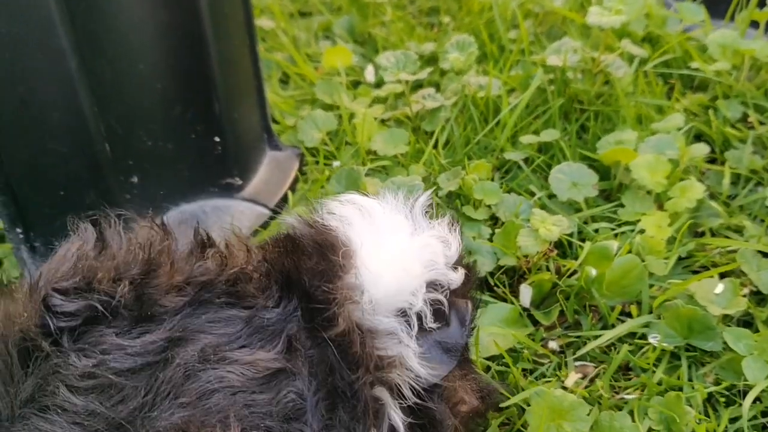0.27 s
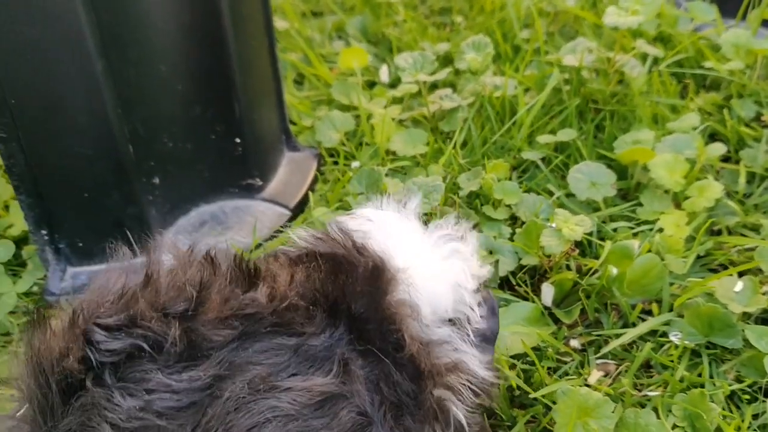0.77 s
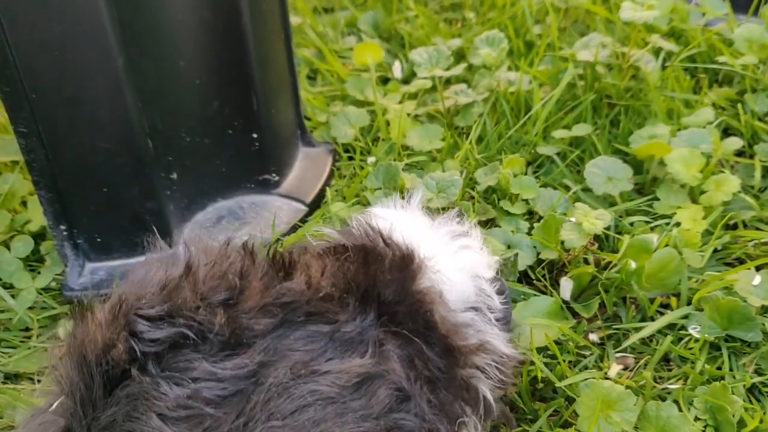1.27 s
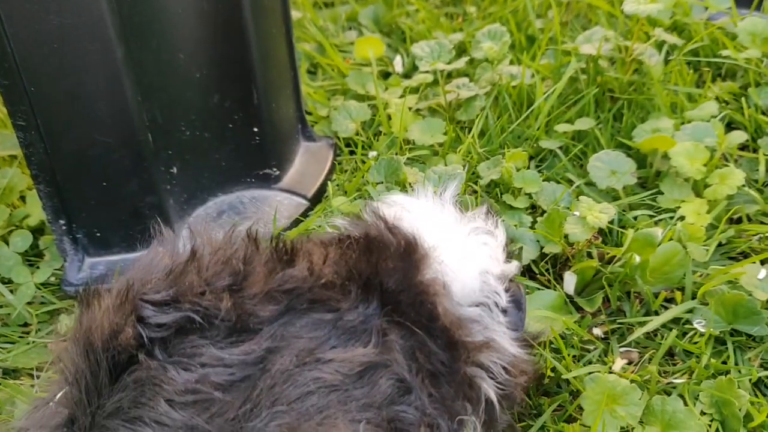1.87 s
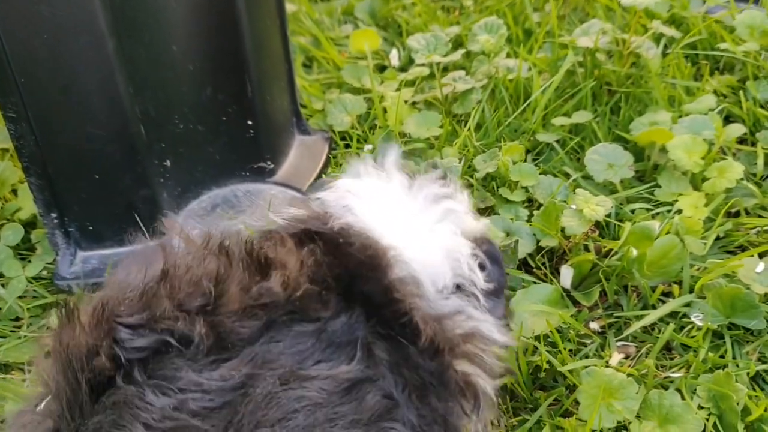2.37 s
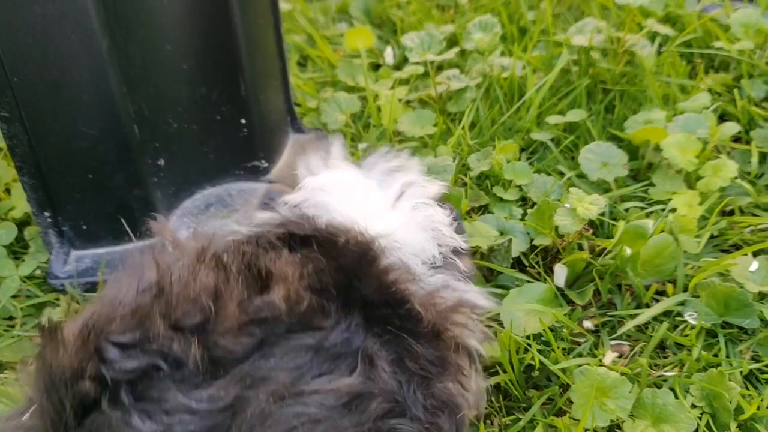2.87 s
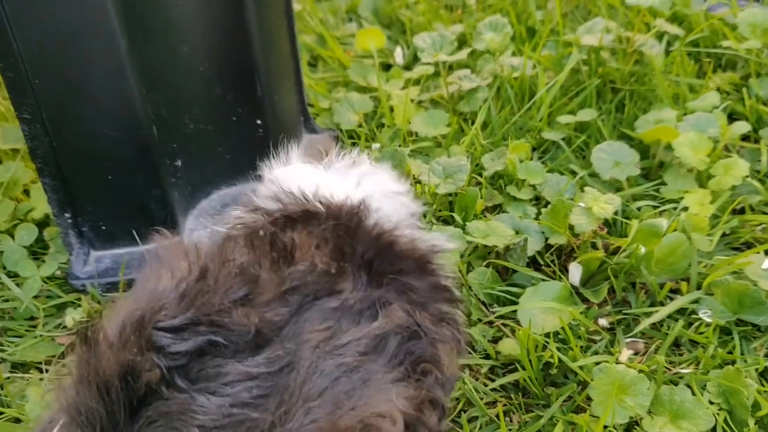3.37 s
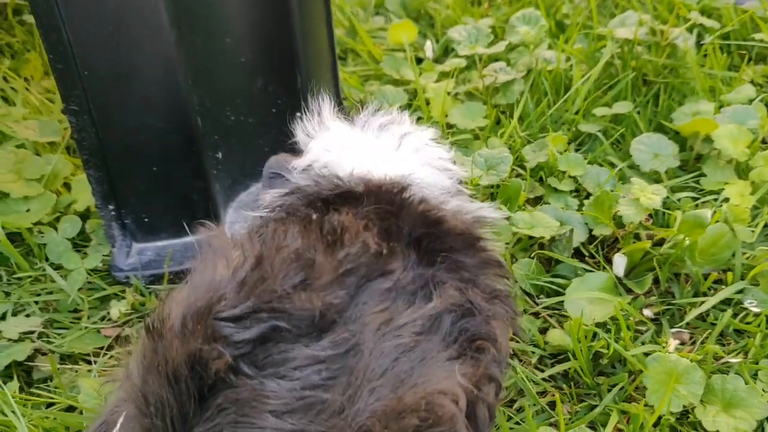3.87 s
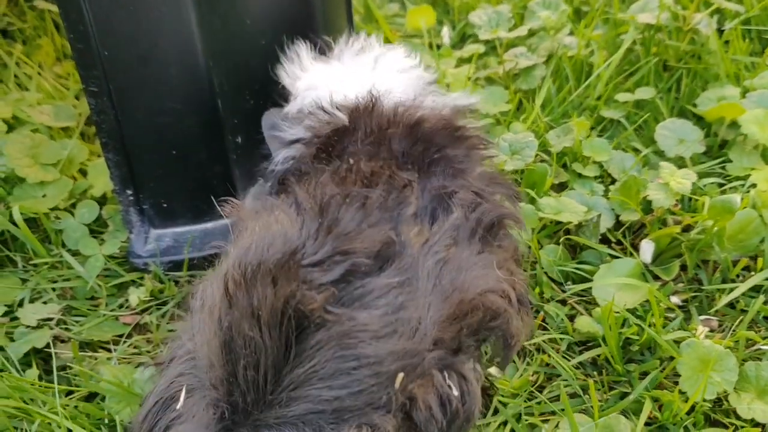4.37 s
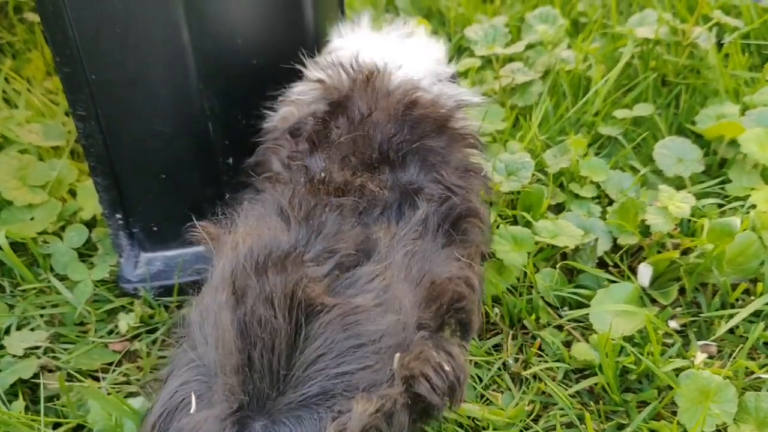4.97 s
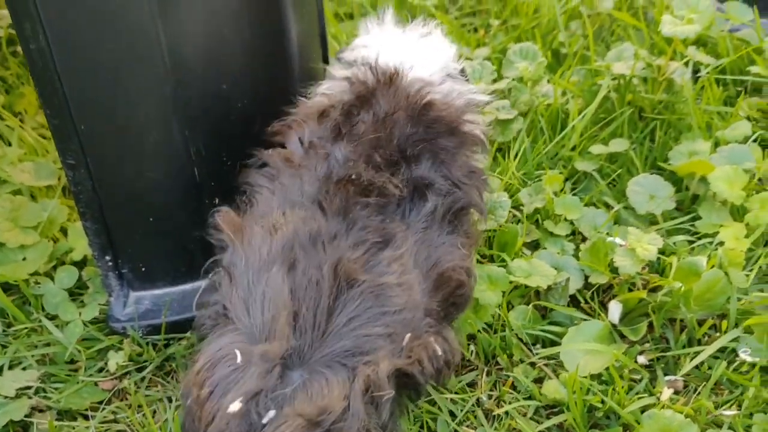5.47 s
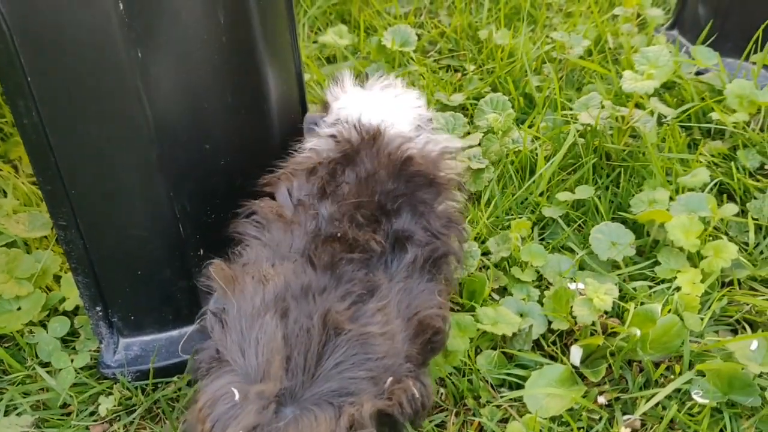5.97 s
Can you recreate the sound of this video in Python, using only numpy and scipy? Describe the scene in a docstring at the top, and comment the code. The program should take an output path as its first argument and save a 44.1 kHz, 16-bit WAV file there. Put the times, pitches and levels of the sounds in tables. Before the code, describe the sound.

Quick soft whistling squeaks and clucks from a small guinea pig outdoors, over low wind buffeting, a distant engine drone and faint bird chirps.

```python
"""A young guinea pig squeaks on a meadow, close to a hand-held stereo microphone.
Each squeak is a gliding, nearly pure tone with a rasp where the voice is pressed; the last shrink to clucks.
Where the whistle breaks or fails to start, short runs of pulses creak, each ringing the throat.
Wind buffets both ports as low noise and single eddies; a far engine drones in narrow bands of noise.
A small bird chirps far off in sliding tones; grass and leaves rustle as grainy hiss, and something snaps once."""
import sys
import numpy as np
from scipy import signal
from scipy.fft import rfft, irfft, next_fast_len
from scipy.io import wavfile

SR = 44100
rng = np.random.default_rng(int(sys.argv[2]) if len(sys.argv) > 2 else 0)


def digitize_waveform(pressure):
    """Quantize a signal to 16-bit integers and store it at the path in sys.argv[1].

    Rows of a 2-D input are taken as channels; values are limited to [-1, 1].
    """
    field = np.atleast_2d(pressure).T
    bounded = np.clip(field, -1, 1)
    quanta = np.round(bounded * 32767).astype(np.int16)
    wavfile.write(sys.argv[1], SR, quanta)


N = 274346
T = np.arange(N) / SR  # time in seconds

# Outdoor background common to both sides, before it is scaled to AIR_MID_DB.
# Each row: frequency in Hz, relative density in dB per Hz.
AIR_MID_COLOUR = [(41, -30), (70, 3), (96, -2), (115, -9), (151, -5), (177, -8), (250, -8.5), (325, -12),
                  (457, -17), (599, -20.5), (1030, -25), (3330, -38), (5360, -39), (15500, -39.5)]
# Outdoor background that differs between the sides, before it is scaled to AIR_SIDE_DB.
# Each row: frequency in Hz, relative density in dB per Hz.
AIR_SIDE_COLOUR = [(41, -33), (70, -7), (169, -18), (237, -10.5), (457, -16), (560, -18), (1410, -20.5),
                   (2910, -32.5), (4370, -31.5), (7350, -33.5), (15500, -33)]
AIR_MID_DB, AIR_SIDE_DB = -47, -56
# Bands of the far engine. Each row: centre in Hz, width of each of two band-passes in Hz, level in dB.
ENGINE_BANDS = [(82, 9.5, -55), (149.7, 16, -54.5), (200.7, 27.5, -60)]
# Far rustle of leaves, before flutter and side balance. Each row: time in seconds, level in dB.
LEAF_LEVELS = [(0, -68.5), (1.1, -70.5), (2.2, -65), (3, -61.5), (4.5, -64), (6.2, -65.5)]

# Turbulence at a microphone port. Each row: frequency in Hz, relative gain in dB.
WIND_COLOUR_POINTS = [(12, -22), (28, 5), (65, -3), (120, -7), (200, -22.5), (400, -29.5), (3000, -84)]
# Gusts on the microphone.
# Each row: middle in seconds, level in dB before sharing, half length in seconds, left share 0-1.
WIND_GUSTS = [(0.355, -37.5, 0.045, 0.8), (0.58, -35, 0.38, 0.89), (1.256, -34, 0.04, 0.85),
              (1.657, -33.5, 0.1, 0.81), (2.331, -40.5, 0.095, 1), (3.225, -34.5, 0.24, 0.59),
              (4.136, -39, 0.14, 0.98), (5.55, -38.5, 0.18, 0), (5.996, -34, 0.041, 0.44)]
# Single eddies that hit a port.
# Each row: middle in seconds, greatest level in dB before sharing, pitch in Hz, left share 0-1.
WIND_EDDIES = [(0.351, -21.5, 107, 0.9), (0.496, -24, 55, 1), (0.611, -18, 80.5, 1),
               (0.648, -18.5, 67.5, 1), (1.244, -23.5, 108, 0.84), (1.577, -21.5, 66, 0.85),
               (1.67, -20, 74.6, 0.9), (1.73, -13, 63.4, 1), (3.109, -19, 73, 0.8), (3.192, -13.5, 74, 1),
               (3.271, -21.5, 77.7, 0.02)]

# Grass blades brushing and ticking close by.
# Each row: middle in seconds, half length in seconds, level in dB at the middle, centre in Hz.
GRASS_BRUSHES = [(0.125, 0.016, -57, 1890), (0.49, 0.03, -66, 10500), (1.506, 0.004, -61, 6000),
                 (3.594, 0.035, -62, 4000), (4.36, 0.06, -64.5, 11500), (4.837, 0.063, -62, 3205)]
RUSTLE_WIDTH = 0.42  # width of each of two band-passes, as a share of the centre

# Runs of separate vocal-fold pulses, before their random spread and the closed mouth.
# Each row: start in seconds, number of pulses, pulses per second, peak in dB,
# throat resonance in Hz, swell time of a pulse in seconds.
CREAK_RUNS = [(0.4489, 1, 280, -32.5, 910, 0.00071), (.575, 3, 230, -42, 980, 0.0018),
              (0.606, 2, 183, -39, 850, 0.0016), (.621, 1, 200, -37.5, 720, 0.002),
              (1.3565, 2, 135, -37, 754, 0.0009), (2.5843, 1, 240, -34, 870, 0.0015),
              (2.591, 3, 243, -35, 823, 0.0013), (3.3541, 5, 265, -32.5, 958.5, 0.00088),
              (4.4393, 2, 370, -32, 787, 0.00093), (4.445, 3, 350, -31.5, 952, 0.00067),
              (4.8544, 2, 380, -32.5, 914, 0.00078), (4.8995, 2, 400, -36, 918, 0.00145),
              (4.9883, 2, 197, -32, 845, 0.00092), (4.9962, 5, 373, -33.5, 953, 0.00033),
              (5.2757, 3, 300, -30, 763, 0.00074), (5.2965, 2, 380, -36.5, 903, 0.00047),
              (5.4491, 2, 160, -37, 789, .001)]
# Each squeak slides to a turning pitch, where the voice is pressed most, and glides on, mostly upward.
# Each row: start in seconds, length in seconds, basic level in dB, first pitch in Hz,
# turn in seconds after the start, turning pitch in Hz, last pitch in Hz,
# bend of the last glide (1 even, more = late), level change from start to end in dB,
# roughness at the turn 0-1, overtone offset in dB.
SQUEAK_GLIDES = [(1.366, 0.007, -39.5, 710, 0.0032, 830, 853, 1.0, 4, 0.1, -4),
                 (1.408, 0.035, -39, 850, 0.014, 849, 1046, 1.95, -8.5, 0.054, 1),
                 (1.5587, 0.12, -35.5, 800, 0.011, 756, 1103, 2.5, -6, 0.012, -1),
                 (1.792, 0.119, -35, 958, 0.0479, 730, 975, 0.8, -1.5, 0.069, 1),
                 (2.0555, 0.11, -35.5, 851, 0.044, 713, 1094, 1.48, -2.5, 0.12, 0),
                 (2.2853, 0.13, -35.5, 747, 0.053, 651, 1119, 0.81, -5.5, 0.066, -1.5),
                 (2.5997, 0.066, -35.5, 882, 0.032, 696, 1006, 2.06, -4.5, 0.044, -4),
                 (2.878, 0.059, -41.5, 668.5, 0.032, 981, 817, 0.88, 8.5, 0.06, -6),
                 (2.965, 0.0089, -42, 1151, 0.0044, 1195, 1177, 1.0, -8, 0.015, 7),
                 (3.0963, 0.075, -33.5, 940, 0.0157, 815, 841, 2.6, -1.5, 0.037, -1.5),
                 (3.3073, 0.043, -34.5, 771.5, 0.026, 938, 1002, 2.84, 10, 0.031, -2.5),
                 (3.3698, 0.036, -40.5, 1078, 0.016, 983, 1316, 1.0, -9, 0.03, 0),
                 (3.908, 0.019, -39, 882, 0.01, 798, 755, 0.85, -12, 0.044, -2),
                 (4.289, 0.0441, -33, 785, 0.032, 754, 881, 1.28, -1.5, 0.24, 1),
                 (4.454, 0.034, -32.5, 717, 0.0096, 729, 725, 1.48, 1, 0.02, -2),
                 (4.841, 0.011, -32, 838, 0.01, 794, 750, 0.69, 0, 0.075, 0.5),
                 (4.8599, 0.0115, -33.5, 691, 0.0049, 772, 849, 0.83, 0, 0.12, 1.5),
                 (5.0085, 0.0055, -36, 619, 0.0032, 640, 775, 1.14, 2, 0.14, -2),
                 (5.2995, 0.0073, -34, 670.5, 0.0051, 796, 708, 0.74, 1, 0.075, -1),
                 (5.4445, 0.0052, -40, 796, 0.0021, 780, 734, 0.78, 5, 0.11, 2)]
# Moments where the voice catches and slips in pitch.
# Each row: middle in seconds, half length in seconds, level change in dB,
# pitch drop as a share (negative lifts it).
VOICE_CATCHES = [(1.631, 0.012, -9, -0.068), (1.657, 0.0071, -14, 0.0282), (1.813, 0.0036, -7, 0.085),
                 (2.3285, 0.0051, -1.5, 0.19), (2.394, 0.0075, -9, 0.15), (2.6274, 0.003, -1, 0.119),
                 (2.654, 0.0072, 3, 0.068), (3.341, 0.0084, -17, 0.045)]
# Upward flicks that fade at the end of some squeaks.
# Each row: start in seconds, length in seconds, rise as a share of the pitch.
END_FLICKS = [(2.412, 0.021, 0.258), (2.663, 0.015, 0.172)]
# Overtones of the voice before effort weights them. Each row: multiple of the pitch, relative level in dB.
VOICE_OVERTONES = [(2, -14.5), (3, -32.5)]
# The closed mouth muffles the overtones. Each row: frequency in Hz, gain in dB.
MOUTH_FILTER = [(200, -15), (450, 9.5), (700, 0.5), (1600, 0), (2000, 5), (2500, -12), (3500, -2),
                (6500, -5), (10000, -20)]

SLIDE_BEND = 1.5  # the first pitch is held a while before it gives way
SCOOP, SCOOP_S = 0.054, 0.00507  # the voice starts flat by this share and settles
DROOP, DROOP_S = 0.02964, 0.00504  # the pitch gives way by this share as the air runs out
PRESS_S = 0.008  # half length of the rough patch at the turn
EASY_HZ, DB_PER_OCTAVE = 759, 2.5  # the higher the pitch, the louder the voice
WEAK_HZ, WEAK_WIDTH_HZ, WEAK_DB = 879, 77, -5  # every glide thins as it passes this pitch
OVERTONE_DB_PER_OCTAVE = -24  # high notes are purer than low ones
ENDS_DB = -3.5  # both ends of a squeak against its middle
FLICK_DB = -25  # level change along a flick

# Far bird, before the direct and scattered parts are balanced.
# Each row: middle in seconds, pitch at the middle in Hz,
# slide on either side of the middle as a share of the pitch, level in dB.
BIRD_CHIRPS = [(0.572, 5130, -.025, -53.5), (1.785, 4990, -0.023, -57), (3.255, 4880, .08, -56),
               (3.98, 4300, -.03, -59), (4.015, 5870, .03, -60), (4.108, 4500, .06, -56.5),
               (4.32, 4757, -.06, -56), (5.81, 6350, -.04, -62), (5.884, 4620, .06, -59)]

# Resonances of the snap, before its envelope.
# Each row: centre in Hz, width of each of two band-passes in Hz, level in dB, decay in seconds.
SNAP_RESONANCES = [(3300, 6100, -48.5, 0.014), (6680, 690, -38, 0.0018), (12400, 4000, -41.5, 0.0055),
                   (14500, 700, -49, 0.023)]
SNAP_S = 5.5555  # moment of the snap in seconds
TOP_HZ = 15800  # the recorder's upper limit


def undb(db):
    """Decibels to gain."""
    return 10 ** (np.asarray(db) / 20)


def unit(x):
    """Scale to an rms of 1."""
    return x / np.sqrt(np.mean(x ** 2))


def shape(x, response):
    """Filter by a gain that is a function of frequency."""
    size = next_fast_len(N)
    hz = np.maximum(np.fft.rfftfreq(size, 1 / SR), 1)
    return irfft(rfft(x, size) * response(hz), size)[:N]


def colour(x, points):
    """Filter by (Hz, dB) points joined on a log-frequency axis."""
    hz, db = np.transpose(points)
    return shape(x, lambda f: undb(np.interp(np.log(f), np.log(hz), db)))


def ring(x, hz, width):
    """A steep resonance: two band-passes in a row."""
    return shape(x, lambda f: 1 / (1 + 1j * (f / hz - hz / f) * hz / width) ** 2)


def noise():
    """White noise."""
    return rng.standard_normal(N)


def walk(rate):
    """A smooth random wander with an rms of 1, slower than about the given rate in Hz."""
    return unit(shape(noise(), lambda f: np.exp(-(f / rate) ** 2)))


def bump(middle, half_length):
    """A smooth swell of height 1 around a moment."""
    return np.exp(-((T - middle) / half_length) ** 2)


def burst(start, decay, rise=0.00049):
    """Envelope of a quick rise and an exponential fall."""
    age = np.maximum(T - start, 0)
    return (1 - np.exp(-age / rise)) * np.exp(-np.minimum(age / decay, 20))


def scatter(x, decay):
    """Diffuse outdoor reflections, unrelated left and right."""
    tails = [unit(noise() * burst(0.0021, decay)) / np.sqrt(N) for _ in range(2)]
    return np.array([signal.fftconvolve(x, tail)[:N] for tail in tails])


def share(left):
    """Gains of the left and right port."""
    return np.array([[left], [1 - left]])


def crackle(hz, width, grain_db=2.5, grain_hz=160):
    """Blades and leaves touching: a band of hiss broken into fine, uneven grains."""
    return unit(ring(noise() * undb(grain_db * walk(grain_hz)), hz, width))


def meadow(flutter_db=1, flutter_hz=14, hum_hz=460, hum_width_hz=22, hum_db=-63, hum_start_s=4.8,
           leaves_left_db=-3):
    """A wide hush of noise with the far engine's drone in the middle and leaves swelling all round."""
    mid = unit(colour(noise(), AIR_MID_COLOUR)) * undb(AIR_MID_DB)
    side = unit(colour(noise(), AIR_SIDE_COLOUR)) * undb(AIR_SIDE_DB)
    for hz, width, db in ENGINE_BANDS:
        mid += unit(ring(noise(), hz, width)) * undb(db)
    # a faint, higher hum joins near the end, over a tenth of a second
    hum = unit(ring(noise(), hum_hz, hum_width_hz)) * undb(hum_db)
    mid += hum * np.clip((T - hum_start_s) * 10, 0, 1)
    # the leaves on either side stir on their own, more of them on the right
    leaves = np.array([crackle(3280, 2730) * undb(flutter_db * walk(flutter_hz)) for _ in range(2)])
    leaves *= undb(np.array([[leaves_left_db], [-leaves_left_db]]) / 2)
    leaf_level = undb(np.interp(T, *np.transpose(LEAF_LEVELS)))
    return np.array([mid + side, mid - side]) + leaves * leaf_level


def wind(breeze_db=-53.0, unrest_db=3.0, unrest_hz=6, eddy_cycles=0.38):
    """Each port has its own turbulence, swelling in gusts; the strongest eddies give a brief push and pull."""
    power = undb(breeze_db + unrest_db * walk(unrest_hz)) ** 2
    for middle, db, half_length, left in WIND_GUSTS:
        power = power + (undb(db) * share(left)) ** 2 * bump(middle, half_length)
    turbulence = np.array([unit(colour(noise(), WIND_COLOUR_POINTS)) for _ in range(2)])
    out = turbulence * np.sqrt(power)
    for middle, db, hz, left in WIND_EDDIES:
        cycles = (T - middle) * hz
        swing = np.sin(2 * np.pi * (cycles + rng.random()))
        eddy = swing / (1 + (cycles / eddy_cycles) ** 2) ** 2
        out += undb(db) * eddy * share(left)
    return out


def grass():
    """Short brushes and ticks of the blades round the animal, as grainy hiss that differs at each port."""
    out = np.zeros((2, N))
    for middle, half_length, db, hz in GRASS_BRUSHES:
        hiss = np.array([crackle(hz, RUSTLE_WIDTH * hz) for _ in range(2)])
        out += hiss * undb(db) * bump(middle, half_length)
    return out


def creaks(timing_spread=0.039, level_spread_db=1, pitch_spread=0.097):
    """Slow, uneven snaps of the vocal folds, each ringing the throat briefly."""
    out = np.zeros(N)
    for s, pulses, rate, db, hz, swell_s in CREAK_RUNS:
        for k, (late, louder, higher) in enumerate(rng.standard_normal((round(pulses), 3))):
            start = s + (k + timing_spread * late) / rate
            on = slice(int(start * SR) + 1, int((start + 10 * swell_s) * SR))
            age = (T[on] - start) / swell_s  # in swell times; the pulse peaks at 1
            cycles = hz * (1 + pitch_spread * higher) * swell_s * (age - 1)
            swell = (age * np.exp(1 - age)) ** 2
            out[on] += undb(db + level_spread_db * louder) * swell * np.cos(2 * np.pi * cycles)
    return out


def ease(along, power):
    """A smooth passage from 0 to 1; a higher power delays it."""
    return np.sin(np.pi / 2 * np.clip(along, 0, 1) ** power) ** 2


def glide(age, length, first, turn_s, turning, last, bend):
    """Pitch of one squeak: scoop in, ease to the turn, ease away and level off, droop at the very end."""
    before = ease(age / turn_s, SLIDE_BEND)
    after = ease((age - turn_s) / (length - turn_s), bend)
    flat = SCOOP * np.exp(-age / SCOOP_S) + DROOP * np.exp((age - length) / DROOP_S)
    return (first + (turning - first) * before + (last - turning) * after) * (1 - flat)


def loudness(hz):
    """Level in dB that follows from pitch: rising with it, but with a weak spot."""
    weak = np.exp(-((hz - WEAK_HZ) / WEAK_WIDTH_HZ) ** 2)
    return DB_PER_OCTAVE * np.log2(hz / EASY_HZ) + WEAK_DB * weak


def controls(edge_s):
    """Pitch, level, roughness, overtone level and on-off gate of the voice through all squeaks."""
    hz = np.full(N, float(EASY_HZ))
    db, rough, overtone_db, gate = np.zeros((4, N))
    for s, length, level, first, turn_s, turning, last, bend, fade, pressure, overtones in SQUEAK_GLIDES:
        on = (T > s - edge_s) & (T < s + length + edge_s)
        age = np.clip(T[on] - s, 0, length)
        hz[on] = glide(age, length, first, turn_s, turning, last, bend)
        rough[on] = np.clip(pressure * np.exp(-((age - turn_s) / PRESS_S) ** 2), 0, 1)
        along = age / length - .5  # -0.5 at the start, 0.5 at the end
        db[on] = level + ENDS_DB * (2 * along) ** 2 + fade * along + loudness(hz[on])
        overtone_db[on] = overtones
        gate[on] = 1 - np.abs(T[on] - s - age) / edge_s
    for middle, half_length, change_db, drop in VOICE_CATCHES:
        catch = bump(middle, half_length)
        hz = hz * (1 - drop * catch)
        db = db + change_db * catch
    for s, length, rise in END_FLICKS:
        start = int(s * SR)
        on = slice(start, start + int(length * SR))
        along = (T[on] - s) / length
        hz[on] = hz[start] * (1 + rise * along)
        db[on] = db[start] + FLICK_DB * along
        gate[on] = np.minimum((1 - along) * length / edge_s, 1)
    return hz, db, rough, overtone_db, gate


def squeaks(edge_s=0.0034, jitter=0.0061, rough_jitter=0.27, rough_shimmer=0.35, rasp_db=-9,
            tremble_db=0.4, tremble_hz=90, wobble=0.007, full_voice_db=-36):
    """The vocal folds whistle on a gliding pitch; when pressed, their cycles turn uneven and rasp."""
    hz, db, rough, overtone_db, gate = controls(edge_s)
    # the voice trembles a little in pitch and level
    tremble = walk(tremble_hz)
    unsteady = wobble * tremble + (jitter + rough_jitter * rough) * walk(284)
    phase = 2 * np.pi * np.cumsum(hz * (1 + unsteady)) / SR
    # soft or high sounds are purer than loud, low or pressed ones
    softness_db = np.minimum(db - full_voice_db, 0) / 2
    height_db = OVERTONE_DB_PER_OCTAVE * np.log2(hz / EASY_HZ)
    effort = undb(softness_db + height_db + overtone_db) + rough
    overtones = sum(undb(d) * np.sin(round(k) * phase) for k, d in VOICE_OVERTONES)
    tone = np.sin(phase) + effort * overtones
    # a pressed voice alternates strong and weak cycles
    uneven = np.cos(phase / 2 + walk(210))
    tone *= np.sqrt(2) * (1 + rough_shimmer * np.sqrt(rough) * uneven) / np.sqrt(1 + rough ** 2)
    # air hisses through once a cycle, a little even in an easy voice
    hiss = unit(ring(noise(), 1700, 3700))
    rasp = hiss * (1 + np.cos(phase)) * (rough + 0.054) * undb(rasp_db)
    return (tone + rasp) * np.sin(gate * np.pi / 2) ** 2 * undb(db + tremble_db * tremble)


def guinea_pig(lag_s=.0001, yard_db=-28, yard_decay_s=0.12):
    """The close voice reaches the left port first; the grass gives back only a faint, short scatter."""
    voice = colour(squeaks() + creaks(), MOUTH_FILTER)
    late_voice = shape(voice, lambda f: np.exp(-2j * np.pi * f * lag_s))
    direct = np.array([voice, late_voice])
    return direct + undb(yard_db) * scatter(voice, yard_decay_s)


def bird(half_length_s=0.05, direct_db=-4.5, echo_db=-2.0, warble=.035, echo_s=.08):
    """Thin, buzzy, distant chirps that slide up or down, blurred by the trees that they pass."""
    song = np.zeros(N)
    waver = warble * walk(255.7)
    for middle, hz, slide, db in BIRD_CHIRPS:
        age = np.clip((T - middle) / half_length_s, -1, 1)
        phase = 2 * np.pi * np.cumsum(hz * (1 + slide * age + waver)) / SR
        song += undb(db) * np.cos(age * np.pi / 2) ** 2 * np.sin(phase)
    return undb(direct_db) * song + undb(echo_db) * scatter(song, echo_s)


def snap(rise_s=0.00027):
    """One small, bright crack with a thin ring: decaying bands of noise, different at each port."""
    out = np.zeros((2, N))
    for hz, width, db, decay in SNAP_RESONANCES:
        band = np.array([unit(ring(noise(), hz, width)) for _ in range(2)])
        out += band * undb(db) * burst(SNAP_S, decay, rise_s)
    return out


def scene():
    """Everything at the two microphone ports."""
    return meadow() + wind() + grass() + guinea_pig() + bird() + snap()


def record(dry):
    """The recorder cuts the top with a steep low-pass."""
    low_pass = signal.ellip(12, .1, 70, TOP_HZ, fs=SR, output="sos")
    return signal.sosfilt(low_pass, dry)


dry = scene()
out = record(dry)
digitize_waveform(out)
```